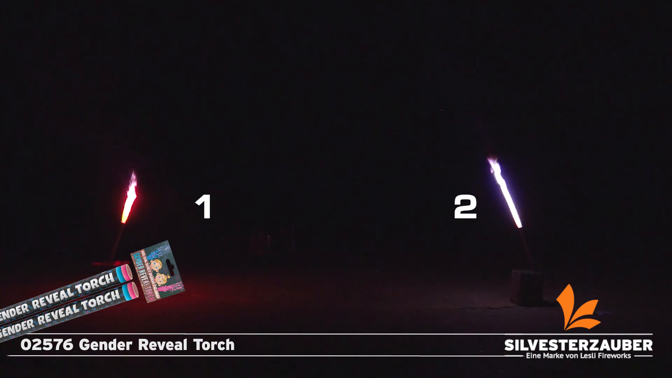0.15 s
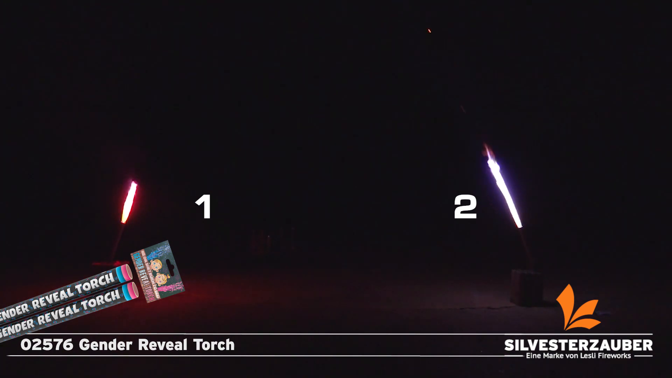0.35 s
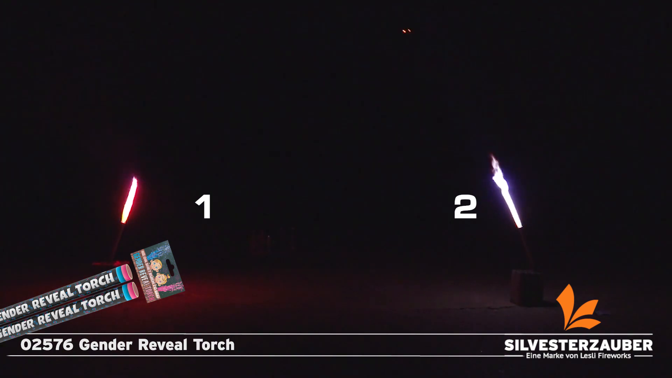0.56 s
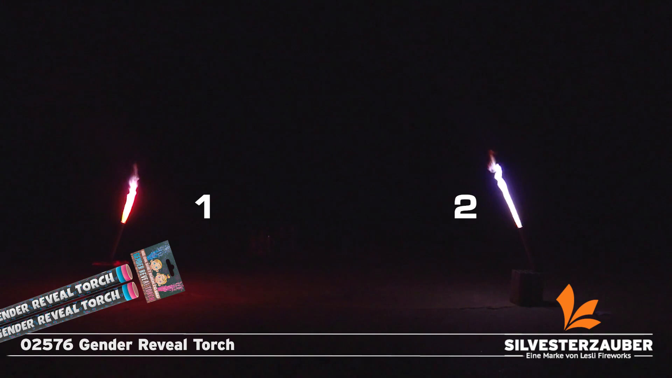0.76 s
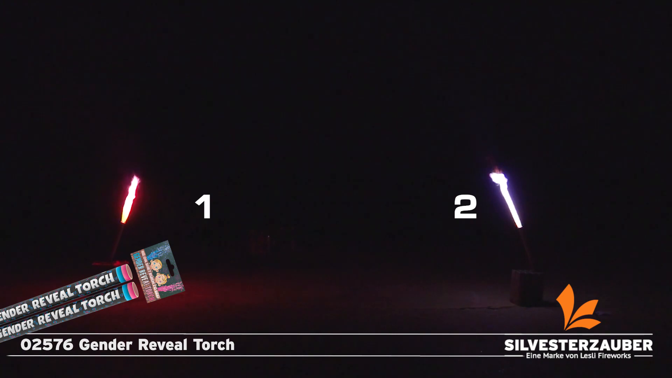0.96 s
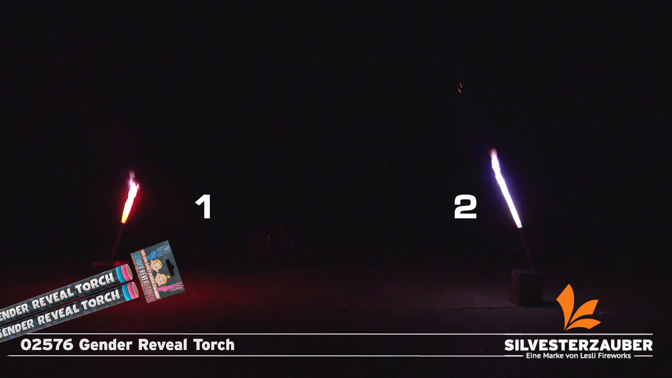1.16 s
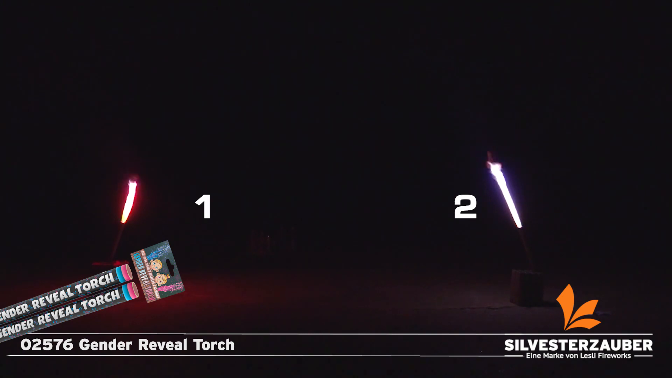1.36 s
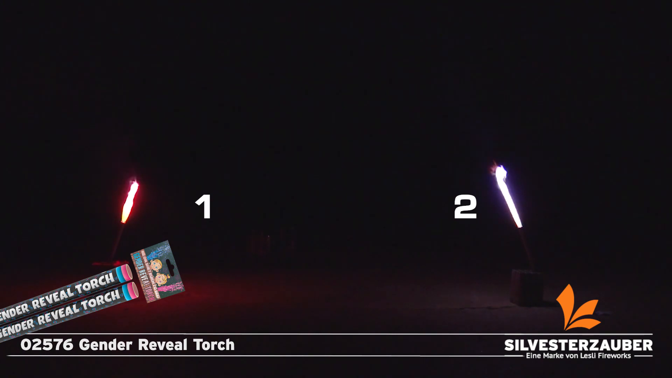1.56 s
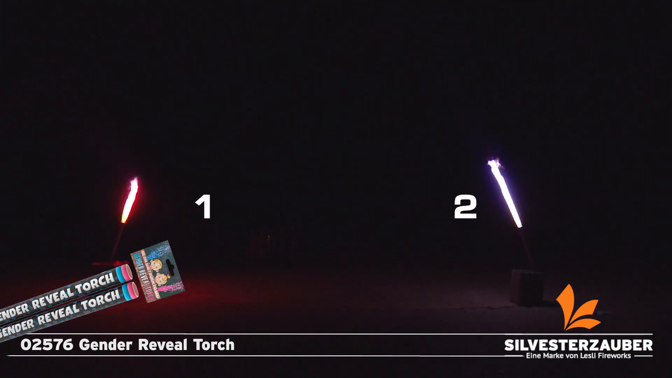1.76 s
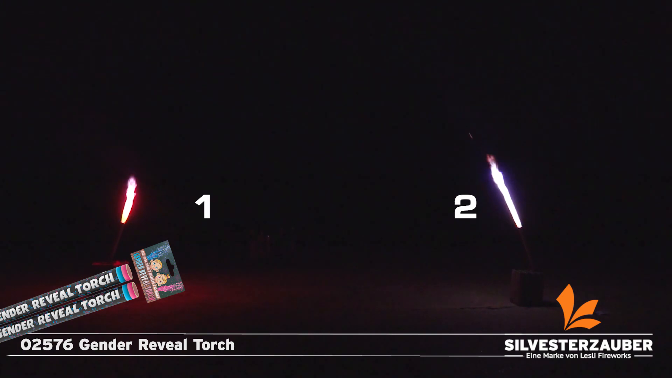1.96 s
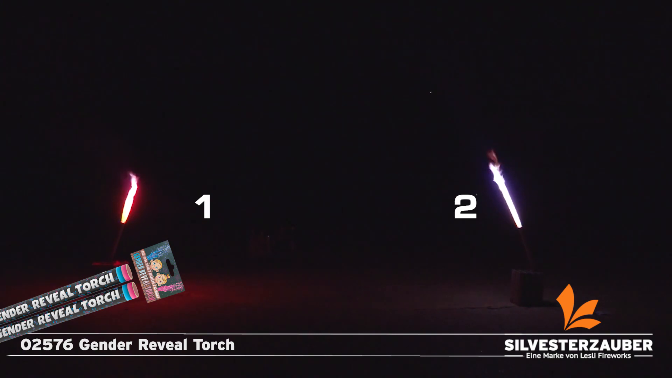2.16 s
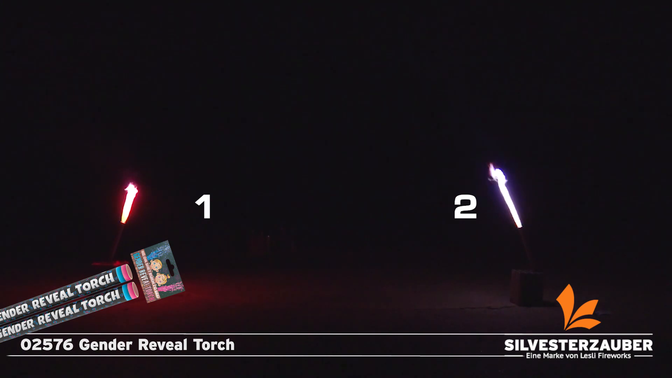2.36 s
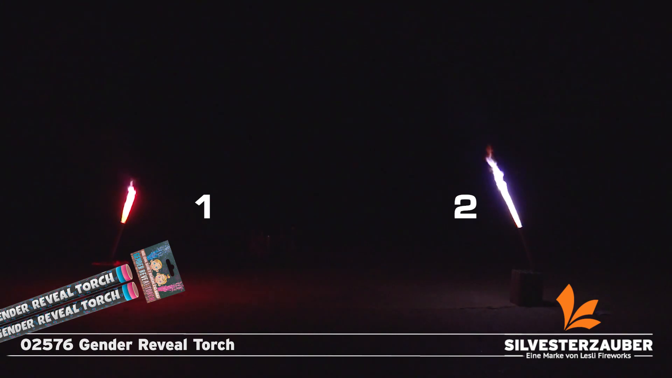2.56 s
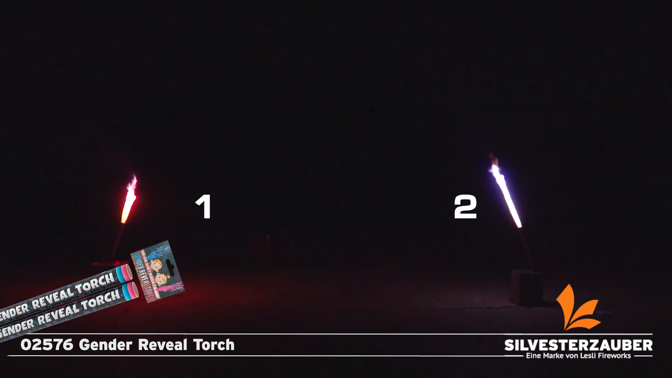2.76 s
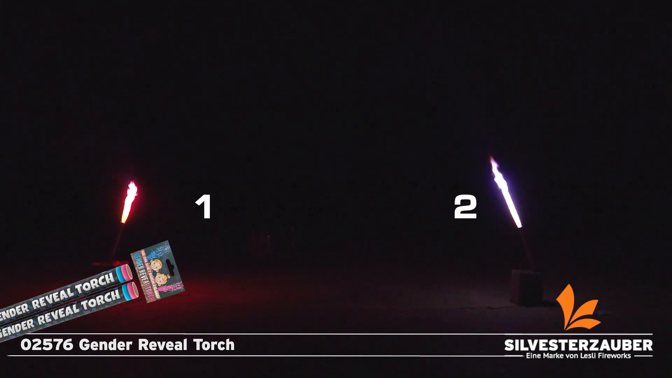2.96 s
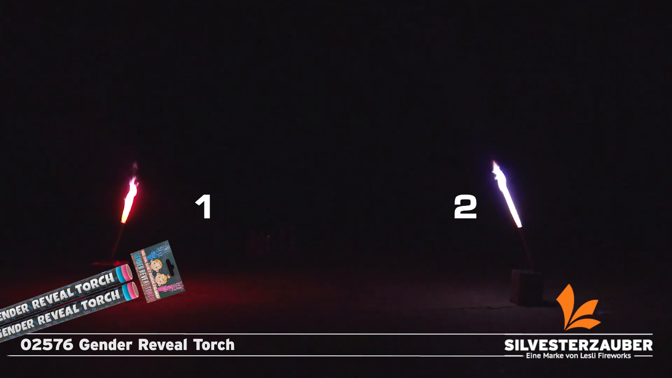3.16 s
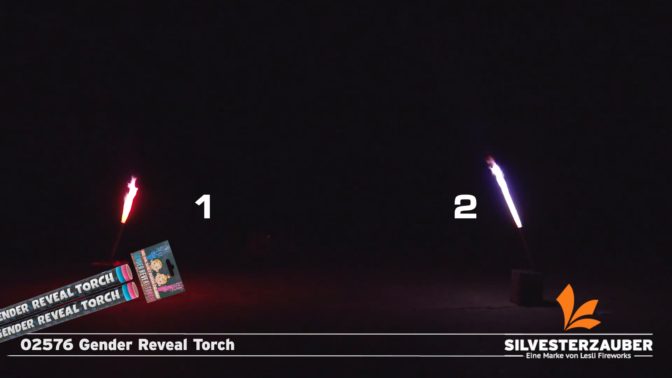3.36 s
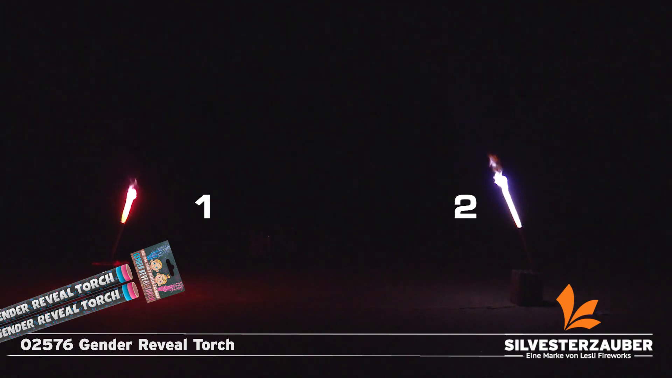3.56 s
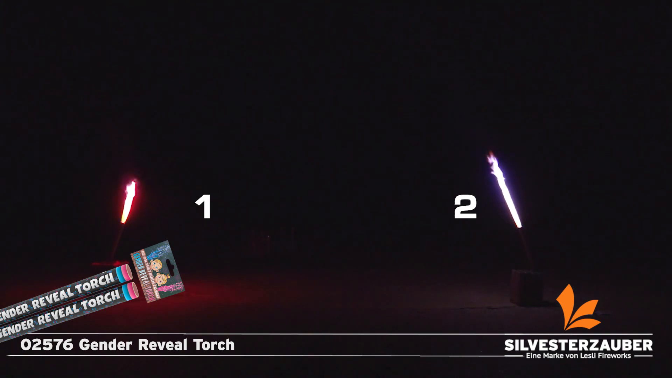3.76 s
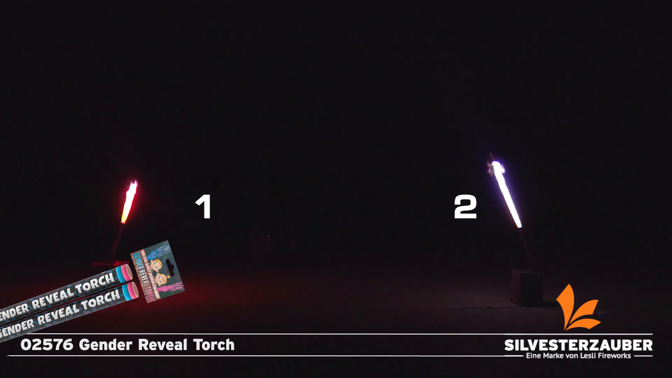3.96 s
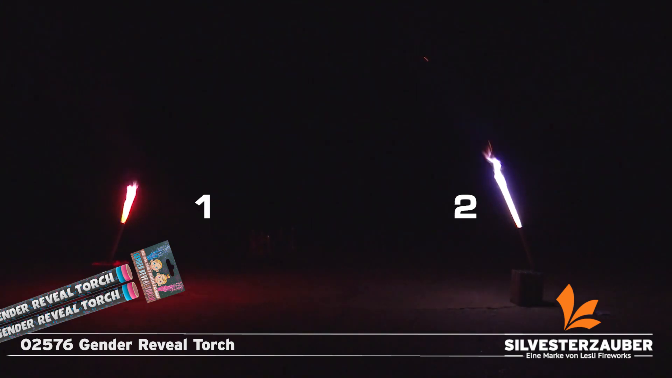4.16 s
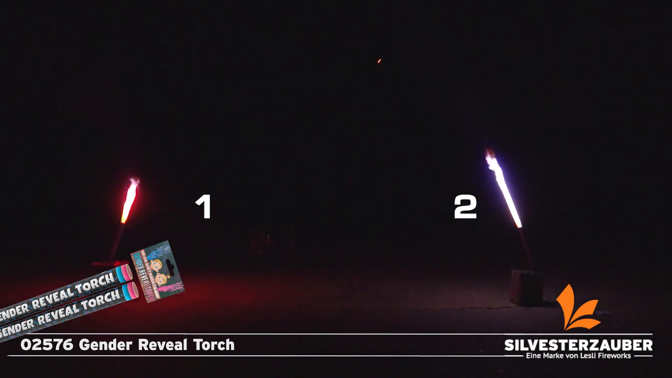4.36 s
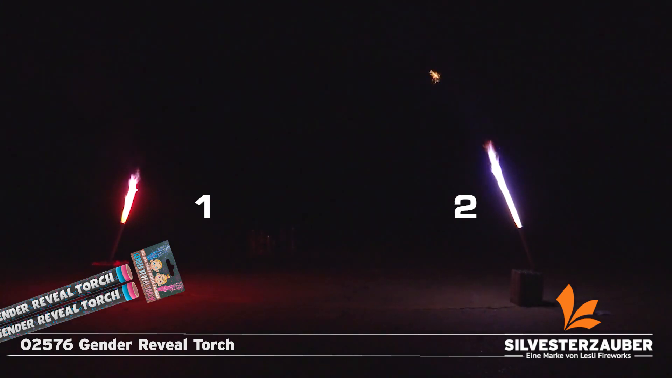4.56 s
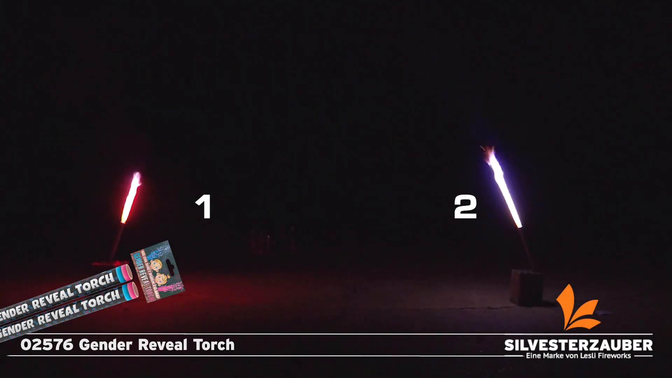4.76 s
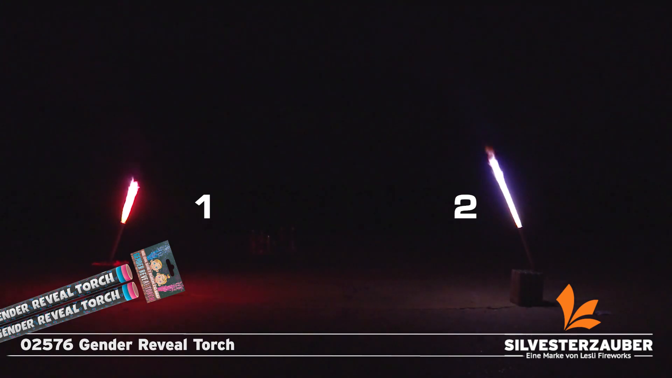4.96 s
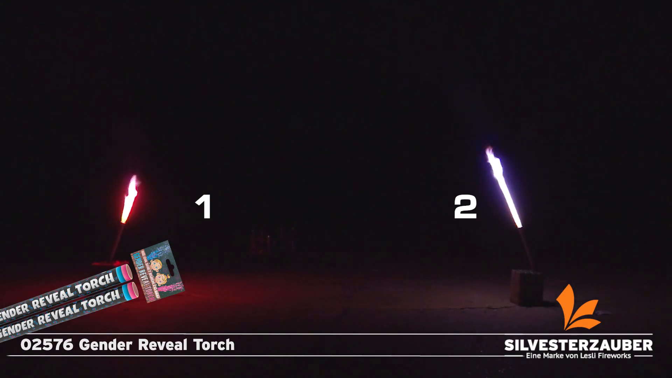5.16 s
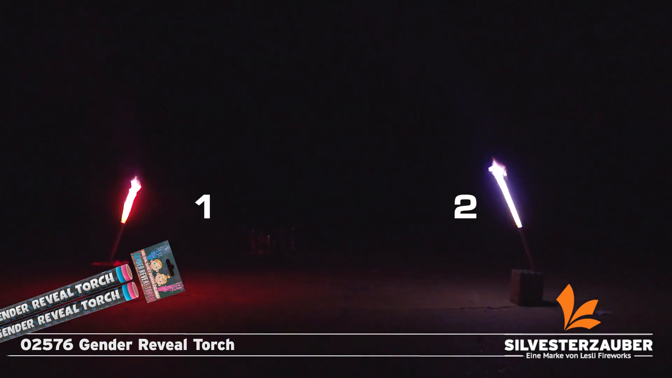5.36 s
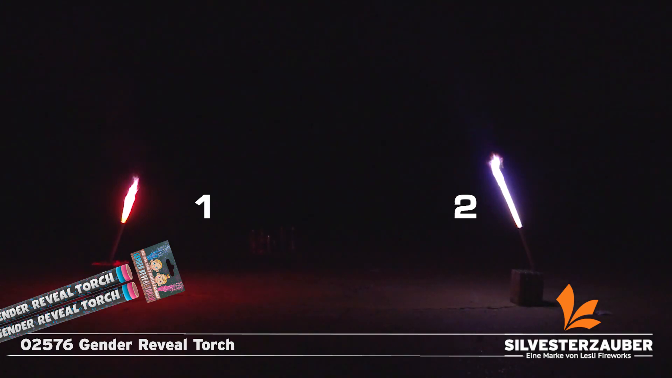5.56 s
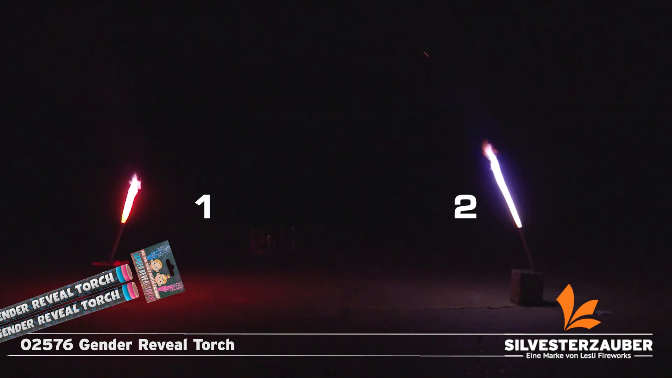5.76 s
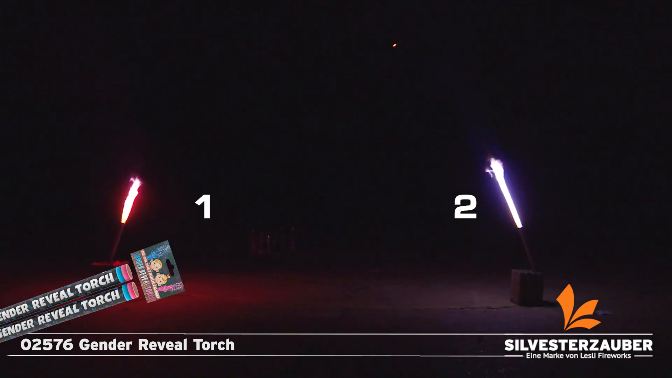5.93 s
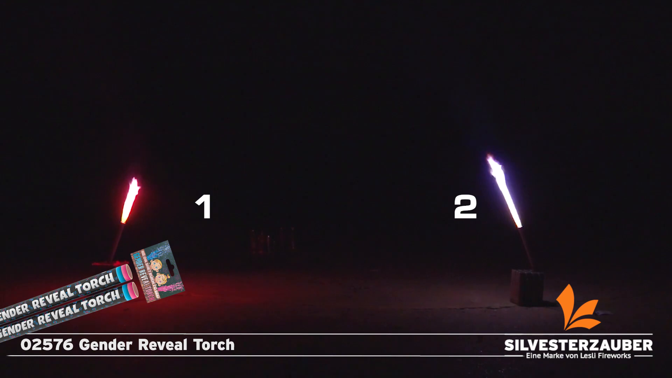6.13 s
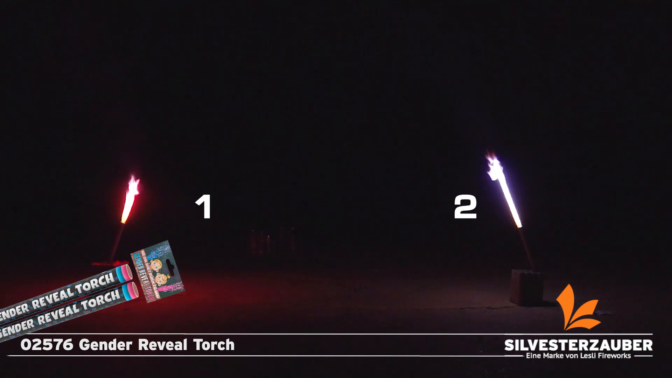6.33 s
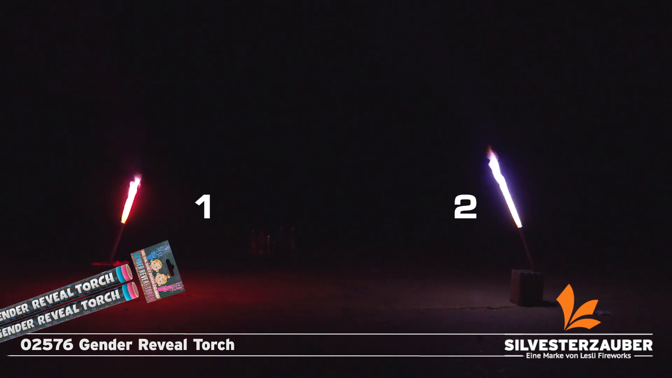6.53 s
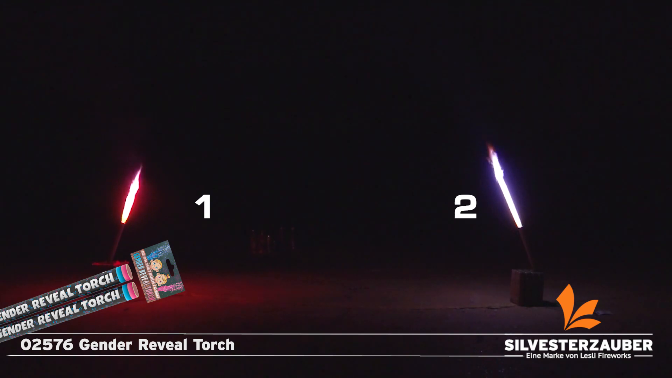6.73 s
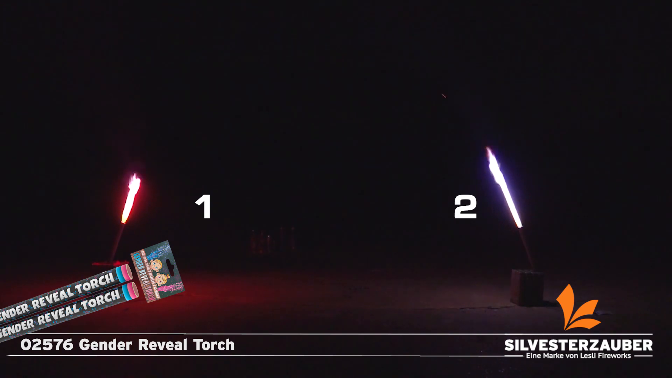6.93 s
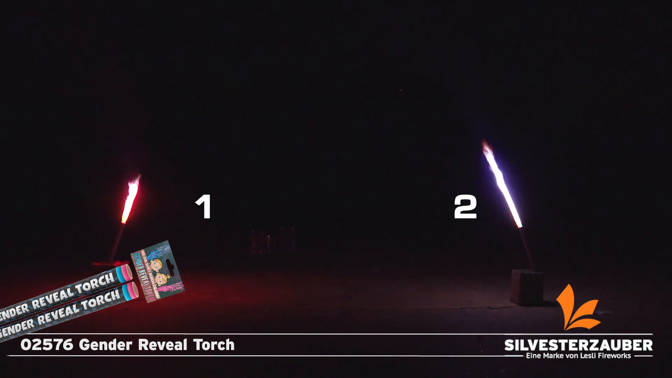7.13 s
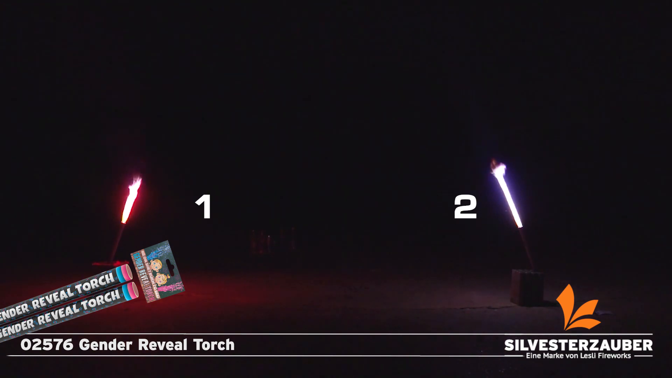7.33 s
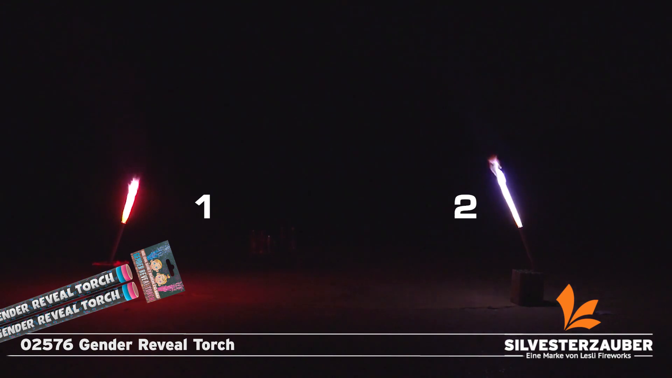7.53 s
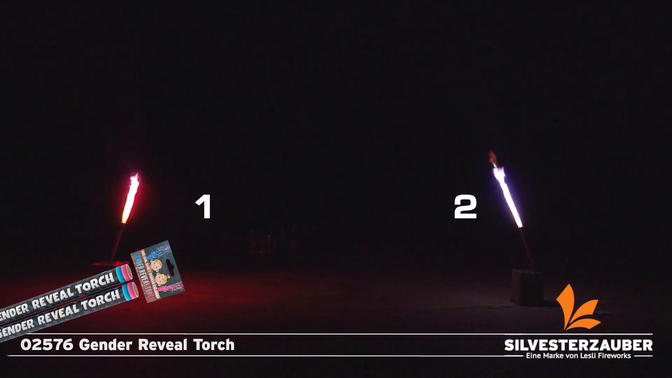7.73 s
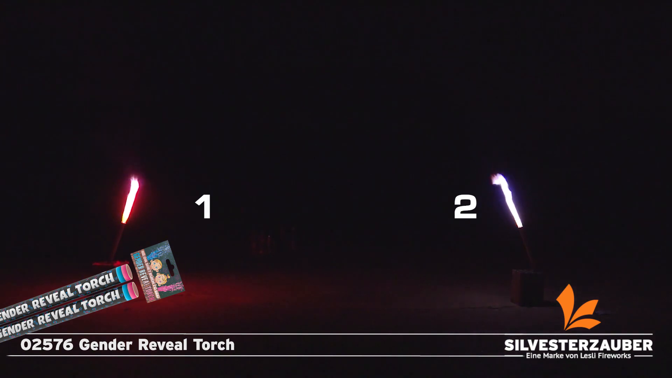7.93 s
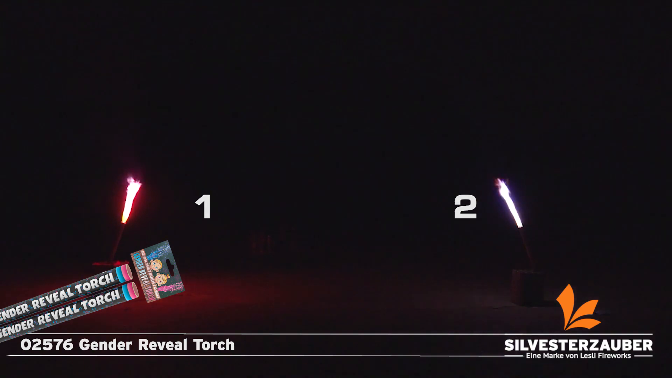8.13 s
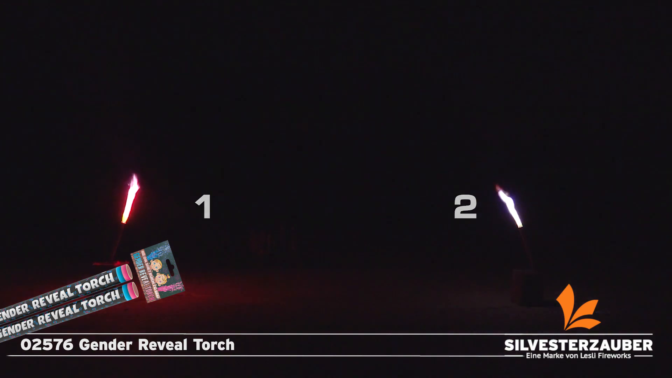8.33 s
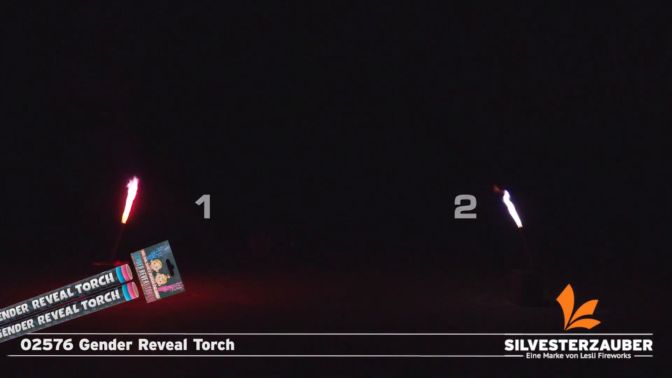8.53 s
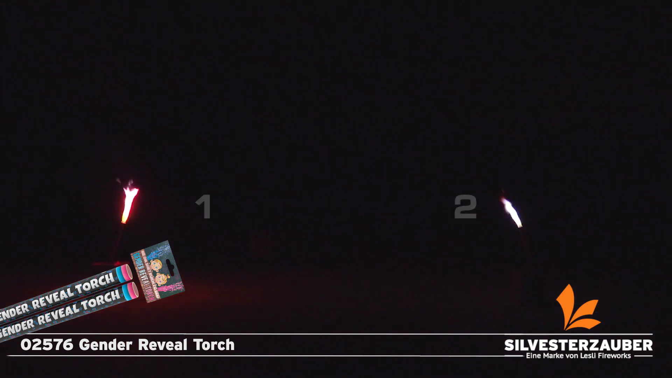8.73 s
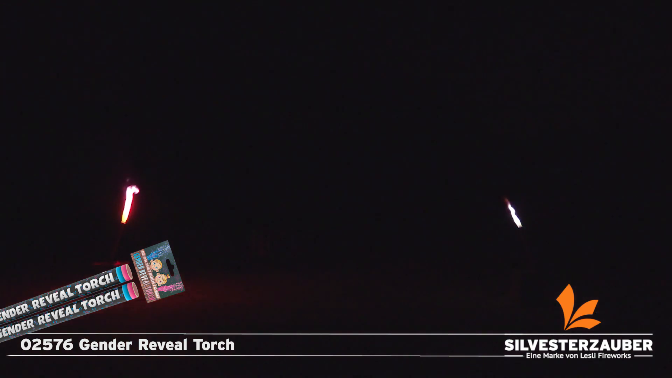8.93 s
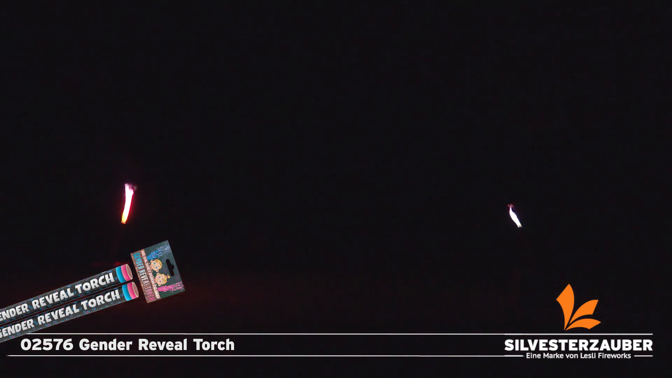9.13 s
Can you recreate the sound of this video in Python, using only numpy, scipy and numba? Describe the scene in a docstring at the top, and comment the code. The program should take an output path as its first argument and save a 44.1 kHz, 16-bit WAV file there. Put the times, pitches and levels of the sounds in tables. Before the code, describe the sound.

Two flare torches burn outdoors, some metres from the microphone, with a continuous hollow hiss. The hiss slowly sinks in pitch and grows a little louder, gaining a thin, whistling edge in the second half. A soft flame roar flutters underneath with faint low thuds, and a few sparks spit. Near the end the hiss starts to die away.

```python
"""A hollow hiss of gas comes from two flare torches burning near hard ground, some metres away at night.
Each tube is a resonator driven by turbulence: its hollow deepens as the charge burns down, so its
resonances sink. Reflection from the ground, a fraction of a millisecond late, colours the sound by
interference. The flames roar softly above, a few sparks spit and low thuds drift by; at the end the
torches begin to die."""
import sys
import numpy as np
from scipy import signal
from scipy.fft import rfft, irfft, next_fast_len
from scipy.io import wavfile
from scipy.ndimage import uniform_filter1d, map_coordinates
from numba import njit

SR = 44100
rng = np.random.default_rng(int(sys.argv[2]) if len(sys.argv) > 2 else 0)


def generate_wav(signal):
    """Clip the signal to [-1, 1] and save it as 16-bit WAV at the path in sys.argv[1]."""
    frames = np.transpose(np.atleast_2d(signal))
    scaled = np.clip(frames, -1, 1) * 32767
    pcm = np.round(scaled).astype(np.int16)
    wavfile.write(sys.argv[1], SR, pcm)


N = 409670


def torch(t, hz, width, lag_ms):
    """Resonance: turbulent gas rings the tube and hisses at its mouth; uneven burning makes both flutter."""
    # Spectrum of the open jet. Each row: frequency in Hz, spectral level in dB.
    jet_spectrum = [(900, -8), (2000, 8.5), (3000, 4), (4300, 1), (5500, -1), (7000, 1), (8600, -2.5),
                    (9400, -2), (11000, -5.5), (13500, -10), (16000, -5)]
    # Upper resonances. Each row: multiple of the lowest resonance, width in Hz, base gain in dB.
    overtones = [(2.9, 900, -12), (3.8, 2100, 2.5), (6.45, 2000, 4.5)]
    flutter = walk(12)
    grain = undb(0.97 * walk(300) + 0.23 * walk(90))
    inside, lip, jet = rng.standard_normal((3, N)) * grain
    hz = hz * (1 + 0.019 * walk(20))  # the hollow breathes as hot gas fills it
    tube = bandpass(bandpass(inside, hz, width), hz, width=2540)
    tube += undb(-18) * bandpass(lip, hz=2580, width=2040)  # the rush at the lip keeps its pitch
    tube = ground(tube * undb(0.15 * flutter), lag_ms)
    tube_db = -45 + 0.5838 * t  # the resonance grows as the hollow deepens
    mouth = coloured(jet, jet_spectrum)
    singing, *upper = [undb(db) * bandpass(mouth, ratio * hz, band) for ratio, band, db in overtones]
    singing_db = np.minimum(-41 + 7 * t, 17)  # the second resonance swells out of the hiss
    hiss = mouth + undb(singing_db) * singing + sum(upper)
    hiss = ground(hiss * undb(0.5 * flutter + 0.14 * walk(35)), lag_ms)
    return undb(tube_db) * unit(tube) + undb(-51) * unit(hiss)


def torches(t):
    """Pitch varies inversely with depth: as two charges burn evenly down, their resonances sink."""
    # The two torches. Each row: factor on the resonance, factor on the echo lag, gain in dB.
    pair = [(0.99, 1.0133, 0.78), (0.983, 0.963, -2)]
    depth = 1 + 0.033 * t  # relative to the starting depth
    base_hz, width_hz = 2305 / depth, 636 - 39 * t
    base_lag_ms = 0.3715 + 0.00039 * t
    fall_db = burnout_db(t)
    second_fall_db = 2.4 * fall_db - 0.74 * t  # the second torch weakens all along and dies faster
    out = np.zeros(N)
    for (pitch, lag, db), fade_db in zip(pair, (fall_db, second_fall_db)):
        out += undb(db + fade_db) * torch(t, pitch * base_hz, width_hz, lag * base_lag_ms)
    return out


def flames(t):
    """Combustion noise: the flames roar, flap and rumble, each with a randomly wavering level."""
    # Spectrum of the roar. Each row: frequency in Hz, spectral level in dB.
    roar_spectrum = [(25, -47), (45, -21), (65, -11), (100, -6.5), (180, -6.5), (300, -3.5), (500, -1.5),
                     (800, 2.5), (1200, -4.5), (2000, -15)]
    # Course of the flapping. Each row: time in seconds, level in dB.
    flap_levels = [(0, -63.5), (.7, -60.5), (4, -59), (4.6, -62.5), (5.3, -56.5), (6, -59.5), (7.7, -63.5),
                   (8.5, -70), (9.29, -80)]
    # Course of the rumble. Each row: time in seconds, level in dB.
    rumble_levels = [(.6, -93), (1.2, -75), (2, -72), (3, -83), (4, -80), (4.6, -91), (5.4, -86), (7, -80),
                     (7.8, -87), (8.5, -76), (9.29, -76)]
    roar = coloured(rng.standard_normal(N), roar_spectrum) * undb(0.55 * walk(8))
    roar = unit(ground(roar, lag_ms=0.449, share=0.44))  # from higher up, so its echo lags more
    roar *= undb(-54 + 0.55 * burnout_db(t))
    flap = noise_band(hz=250, widths=(260, 500))
    flap *= undb(np.interp(t, *np.transpose(flap_levels)) + 1.14 * walk(8.1))
    rumble = noise_band(hz=38, widths=(30, 30))
    rumble *= undb(np.interp(t, *np.transpose(rumble_levels)) + 3.7 * walk(5.6))
    return roar + flap + rumble


def sparks():
    """Impulse and free decay: each spark is a crack of noise with a short, damped ring."""
    # Spitting sparks. Each row: start in seconds, peak level in dB, decay time in ms.
    spits = [(3.7344, -40, 4.0), (5.2665, -29.5, 3.7), (5.2728, -33, 4.0), (6.1523, -27, 5.5),
             (7.946, -35.5, 6.4)]
    # Ring after a spit. Each row: frequency in Hz, level relative to the spit in dB, T60 in seconds.
    ring_modes = [(8800, -11.5, 0.035), (1520, -12, 0.019)]
    t = np.arange(SR // 20) / SR
    ring = sum(undb(db - 60 * t / t60) * np.sin(2 * np.pi * hz * t) for hz, db, t60 in ring_modes)
    out = np.zeros(N)
    for start, db, decay_ms in spits:
        add_at(out, start, undb(db) * burst(6600, decay_ms, width_share=0.9))
        add_at(out, start, undb(db) * ring)
    return out


def thuds():
    """Band-limited transients: brief swells of deep noise are heard as dull thuds."""
    # Low thuds. Each row: start in seconds, peak level in dB, centre frequency in Hz.
    events = [(0.658, -54, 51.4), (1.658, -52, 48), (1.8, -59, 33), (2.314, -64, 59.2), (3.572, -61, 43.1),
              (4.025, -60, 35.0), (4.152, -60, 48.4), (6.16, -60, 32.3), (6.857, -65, 45.8),
              (7.346, -58, 37.7), (8.475, -57, 29.6)]
    out = np.zeros(N)
    for start, db, hz in events:
        add_at(out, start, undb(db) * burst(hz, decay_ms=67, width_share=0.78))
    return out


def ground(x, lag_ms, share=0.84):
    """Interference: the direct sound and its delayed mirror image from the ground form a comb filter."""
    echo = map_coordinates(x, [np.arange(N) - lag_ms * SR / 1000], order=3)
    return (x + share * echo) / np.sqrt(1 + share ** 2)


def burnout_db(t, start_s=7.36):
    """Accelerating decay: as the charge runs out, the level falls with the square of the time elapsed."""
    return -1.5 * np.maximum(t - start_s, 0) ** 2


def burst(hz, decay_ms, width_share):
    """Transient excitation: noise with a sharp start and Gaussian decay drives a band-pass; peak 1."""
    t_ms = 1000 * np.arange(SR // 4) / SR
    noise = rng.standard_normal(len(t_ms)) * np.exp(-(t_ms / decay_ms) ** 2)
    width = width_share * hz
    band = bandpass(bandpass(noise, hz, width), hz, width)
    return band / np.abs(band).max()


def noise_band(hz, widths):
    """Cascaded filtering: two band-passes confine white noise around one frequency; rms 1."""
    band = bandpass(rng.standard_normal(N), hz, widths[0])
    return unit(bandpass(band, hz, widths[1]))


def bandpass(x, hz, width):
    """Second-order resonance with gain 1 at its centre; centre and width in Hz, steady or moving."""
    steady = np.ones(len(x))
    return state_variable_filter(x, hz * steady, width * steady)


@njit
def state_variable_filter(x, hz, width):
    """Two integrators in a feedback loop act as a damped oscillator."""
    y, band_state, low_state = np.empty(len(x)), 0., 0.
    for i in range(len(x)):
        gain, damping = np.tan(np.pi * hz[i] / SR), width[i] / hz[i]
        band = (band_state + gain * (x[i] - low_state)) / (1 + gain * (gain + damping))
        band_state = 2 * band - band_state
        low_state += 2 * gain * band
        y[i] = damping * band
    return y


def coloured(x, points):
    """Spectral shaping along (Hz, dB) points on a logarithmic frequency axis; rms 1."""
    hz, db = np.transpose(points)
    size = next_fast_len(N)
    bin_hz = np.maximum(np.arange(size // 2 + 1) * SR / size, 1)
    gain = undb(np.interp(np.log(bin_hz), np.log(hz), db))
    return unit(irfft(rfft(x, size) * gain, size)[:N])


def walk(rate):
    """Random fluctuation: values held for 1 / rate seconds and smoothed twice; rms 1."""
    hold = int(SR / rate)
    steps = np.repeat(rng.standard_normal(N // hold + 1), hold)
    return unit(uniform_filter1d(uniform_filter1d(steps, hold), hold)[:N])


def add_at(out, start_s, sound):
    """Superpose a sound from its start time on."""
    i = int(start_s * SR)
    out[i:i + len(sound)] += sound[:N - i]


def undb(db):
    """Decibels to amplitude ratio."""
    return 10 ** (np.asarray(db) / 20)


def unit(x):
    """Normalise to rms 1."""
    return x / np.sqrt(np.mean(x ** 2))


def scene():
    """Superposition: torches, flames, sparks and thuds add in one channel."""
    t = np.arange(N) / SR
    return (flames(t) + sparks() + thuds() + torches(t))[None]


def record(dry, bass_hz=30, top_hz=15750):
    """Band limiting: the microphone drops the deepest bass and a steep low-pass cuts the top."""
    high_pass = signal.butter(3, bass_hz, "high", fs=SR, output="sos")
    low_pass = signal.ellip(16, .2, 70, top_hz, fs=SR, output="sos")
    return signal.sosfilt(low_pass, signal.sosfilt(high_pass, dry))


dry = scene()
out = record(dry)
generate_wav(out)
```